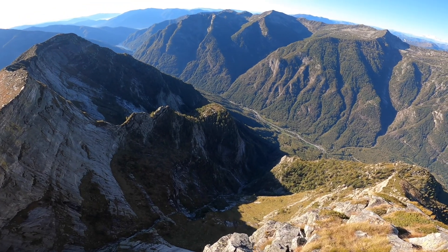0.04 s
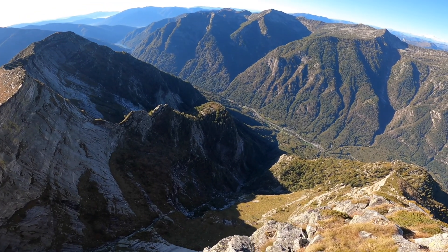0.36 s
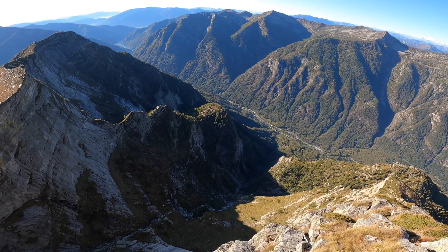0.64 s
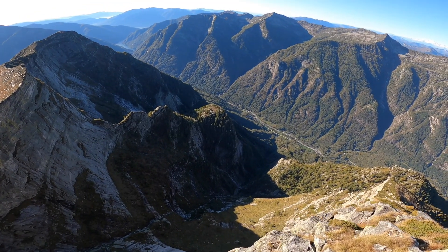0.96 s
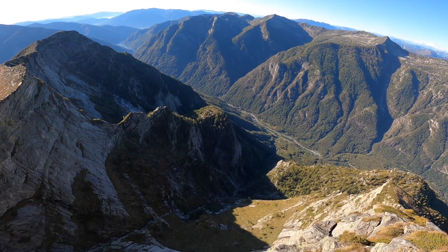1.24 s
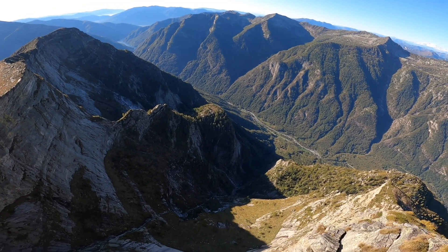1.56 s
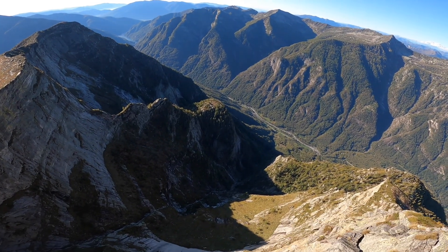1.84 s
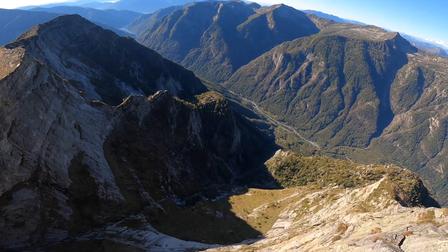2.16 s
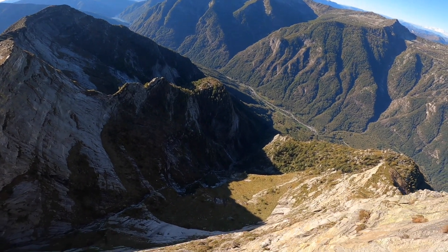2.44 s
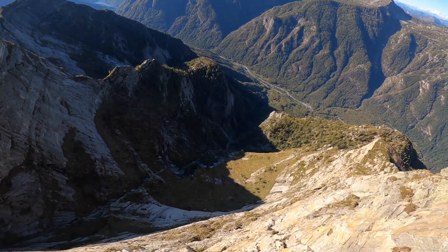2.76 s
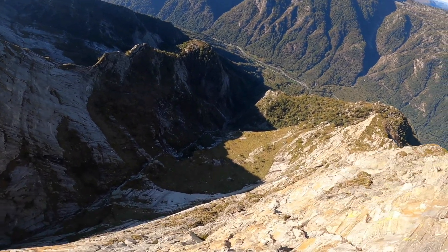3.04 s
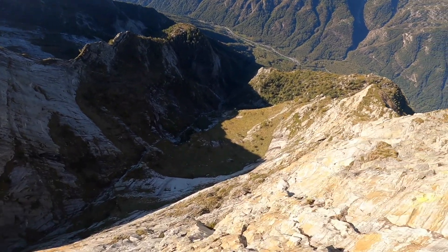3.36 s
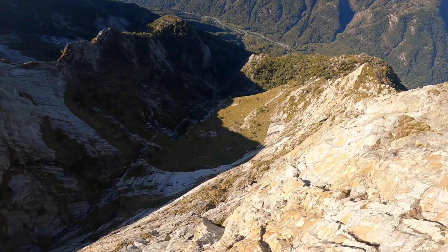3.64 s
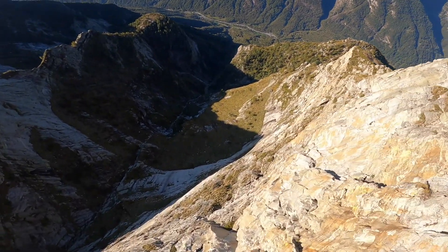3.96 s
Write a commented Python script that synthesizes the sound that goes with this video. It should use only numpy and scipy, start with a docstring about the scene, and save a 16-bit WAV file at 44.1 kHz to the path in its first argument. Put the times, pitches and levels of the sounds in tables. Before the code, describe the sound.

Wind rushes over a body-worn microphone during a jump from a mountain edge. First come a light breeze, gear clicks and shoe scuffs on rock, then a loud buffeting roar with a hiss that brightens as the fall speeds up.

```python
"""A mountain edge, heard from a body-worn microphone: a light breeze nudges it, gear clicks and
shoes scuff off the rock. Then the fall begins. Air buffets the microphone port, eddies tear past
in a ragged roar, and a hiss grows louder, smoother and brighter with speed.
A compressor and a limiter hold the level."""
import sys
import numpy as np
from scipy import signal
from scipy.fft import rfft, irfft
from scipy.io import wavfile
from scipy.ndimage import uniform_filter1d, minimum_filter1d

SR = 44100
rng = np.random.default_rng(int(sys.argv[2]) if len(sys.argv) > 2 else 0)


def master_out(mix):
    """Clip the mix to full scale and print it as 16-bit PCM to the path in sys.argv[1]."""
    frames = np.transpose(np.atleast_2d(mix))
    ceiling = np.clip(frames, -1, 1)
    pcm = np.round(ceiling * 32767).astype(np.int16)
    wavfile.write(sys.argv[1], SR, pcm)


N = 176400
TIME = np.arange(N) / SR

# Clicks of gear and grit. Each row: time in seconds, relative level in dB.
CLICKS = [(0.1828, -30.5), (.730, -44), (0.783, -46), (0.899, -40), (1.215, -26.5), (1.277, -36),
          (1.383, -14.5), (1.3937, -26), (1.401, -26), (1.4298, -19), (1.455, -30), (1.4578, -18.5),
          (1.5055, -30), (1.516, -31.5), (1.6065, -26.5), (1.618, -32)]


def from_db(db):
    """Decibels to gain."""
    return 10 ** (np.asarray(db) / 20)


def curve(rows):
    """An automation curve: straight lines between rows of time in seconds and value."""
    return np.interp(TIME, *np.transpose(rows))


def swell(peak_s, attack_s, decay_s):
    """Exponential rise to a peak of 1, then exponential fall."""
    return np.exp(-np.maximum((peak_s - TIME) / attack_s, (TIME - peak_s) / decay_s))


def noise(colour):
    """Coloured noise at rms 1, rolled off beyond both ends of its colour table."""
    hz, db = np.transpose(colour)
    bins = np.maximum(np.arange(N // 2 + 1) * SR / N, 1)
    gain = from_db(np.interp(np.log(bins), np.log(hz), db))
    gain /= np.sqrt(1 + (hz[0] / bins / 2) ** 4) * (1 + (bins / hz[-1] / 2) ** 4)
    x = irfft(rfft(rng.standard_normal(N)) * gain, N)
    return x / x.std()


def drift(rate_hz):
    """Smooth random motion with a spread of 1."""
    pole = np.exp(-2 * np.pi * rate_hz / SR)
    x = signal.lfilter([1], [1, -2 * pole, pole * pole], rng.standard_normal(N + SR))[SR:]
    return x / x.std()


def resonance(hz, width_hz):
    """Noise at rms 1 ringing in one resonance, whose centre may move."""
    slow = signal.sosfilt(signal.butter(2, width_hz / 2, fs=SR, output="sos"), rng.standard_normal((2, N)))
    phase = 2 * np.pi * np.cumsum(hz * np.ones(N)) / SR
    x = slow[0] * np.cos(phase) + slow[1] * np.sin(phase)
    return x / x.std()


def buffeting(rough_db=2.5, flutter_hz=15.3):
    """Lumpy pressure swings on the port, with a slower, deep rumble under them."""
    # Strength of the swings. Each row: time in seconds, level in dB.
    lump_level = [(0, -48.5), (.33, -51.5), (.42, -45), (.52, -56.5), (.58, -40), (.665, -46), (.69, -28.5),
                  (.73, -41.5), (.78, -31), (.895, -32.5), (.925, -51), (.965, -46), (.985, -32.5),
                  (1.05, -38.5), (1.15, -63), (1.34, -50.5), (1.39, -44), (1.52, -36), (1.545, -25.5),
                  (1.605, -22), (1.64, -18.5), (1.78, -19), (2.3, -15.5), (2.9, -16), (3.25, -16.5),
                  (3.55, -16), (3.75, -17), (4, -12)]
    rumble_level = [(0, -39), (.55, -46), (.8, -36), (.93, -38), (1.04, -30.5), (1.2, -50.5), (1.35, -49),
                    (1.49, -33), (1.56, -25), (1.8, -21.5), (2.0, -26), (2.8, -23), (3.2, -30.5),
                    (4, -19.5)]
    # Their colours. Each row: frequency in Hz, relative level in dB.
    lump_colour = [(22, -7), (45, -1.5), (95, 2), (140, 0), (195, 0.5), (260, -3.5), (330, -6.5),
                   (430, -16.5), (650, -28.5), (1500, -63.5)]
    rumble_colour = [(20, -6.5), (40, -2.5), (65, -5.5), (110, -15.5), (300, -46)]
    lumps = noise(lump_colour) * from_db(curve(lump_level) + rough_db * drift(flutter_hz))
    return lumps + noise(rumble_colour) * from_db(curve(rumble_level))


def hollow_drone():
    """Air drones in a hollow by the port; the pitch wanders with the angle of the flow."""
    # The drone's strength. Each row: time in seconds, level in dB.
    level = [(0, -71), (1.45, -68), (1.77, -26.5), (2.3, -23.5), (2.9, -20), (3.15, -16.5), (3.42, -19),
             (3.52, -31.5), (3.8, -16.5), (4, -39)]
    # Its pitch. Each row: time in seconds, frequency in Hz.
    pitch = [(1.78, 200), (2.4, 160), (2.68, 220), (2.85, 130.1), (3.2, 195), (3.4, 209.8), (3.55, 150),
             (3.85, 205)]
    return resonance(curve(pitch), width_hz=86) * from_db(curve(level))


def wake():
    """The wake of the falling body roars in a broad, low band."""
    # The roar's strength. Each row: time in seconds, level in dB.
    level = [(1.5, -65), (1.65, -29), (2.05, -30), (2.25, -20), (2.6, -22.5), (2.9, -27.5), (3.3, -28.5),
             (3.6, -30), (4, -20)]
    # Its centre. Each row: time in seconds, frequency in Hz.
    centre = [(1.9, 340.5), (2.45, 438.9), (3.65, 319.6)]
    return resonance(curve(centre), width_hz=270) * from_db(curve(level))


def eddies(bursts, gusts, burst_db=1.5, gust_db=1.2):
    """Eddies tear past in a roar made ragged by fast bursts and slower gusts."""
    # Strength of the eddies. Each row: time in seconds, level in dB.
    level = [(0, -75), (.52, -59.5), (.70, -54), (.89, -46.5), (.95, -55.5), (1.15, -63.5), (1.35, -47.5),
             (1.52, -45.5), (1.605, -41), (1.64, -38), (1.72, -19.5), (1.745, -38.5), (1.775, -22),
             (1.86, -27.5), (1.92, -20), (2.1, -23.5), (2.28, -23.5), (2.6, -22.5), (3.1, -26),
             (3.45, -27.5), (4, -23)]
    # Their colour. Each row: frequency in Hz, relative level in dB.
    colour = [(150, -17.5), (330, 3.5), (450, -2), (650, -1), (1000, -6), (1600, -11.5), (2300, -20),
              (4800, -30.5), (7000, -77), (14000, -90.5)]
    return noise(colour) * from_db(curve(level) + burst_db * bursts + gust_db * gusts)


def airstream(bursts, gusts, split_hz=6050):
    """Rushing air hisses, shaken by the eddies; with speed it evens out and gains top."""
    # The hiss follows the speed. Each row: time in seconds, level in dB.
    level = [(0, -81), (1.55, -65), (1.715, -57), (1.75, -62), (1.805, -42), (1.86, -44), (1.92, -38.5),
             (2.1, -38.5), (2.27, -43.5), (2.39, -34.5), (2.44, -40.5), (2.65, -37), (2.8, -38.5),
             (2.88, -35.5), (3.02, -37), (3.1, -30), (3.4, -29.5), (3.65, -26), (3.82, -26), (4, -25.5)]
    # Its colour. Each row: frequency in Hz, relative level in dB.
    colour = [(400, -13.5), (900, -0.5), (1650, 0.5), (2300, -4), (3000, -1.5), (3900, 0.5), (5100, -2),
              (6200, -13.5), (7600, -24), (8700, -23), (11000, -37), (15000, -59.5)]
    level_db = curve(level)
    below_full_db = np.minimum(level_db.max() - level_db, 20)
    flutter_db = (0.5 + 0.13 * below_full_db) * (0.68 * bursts + 0.097 * gusts)
    hiss = noise(colour)
    body = signal.sosfiltfilt(signal.butter(2, split_hz, fs=SR, output="sos"), hiss)
    top = (hiss - body) * from_db(-0.92 * below_full_db)
    return (body + top) * from_db(level_db + flutter_db)


def blasts(rough_db=5.5, crackle_hz=200, top_hz=4800):
    """Short gusts break up into crackle at the port."""
    # Single gusts. Each row: peak time in seconds, level in dB, attack and decay in seconds.
    hits = [(0.689, -51, 0.0024, 0.0055), (0.7632, -30, 0.0016, 0.0095), (1.623, -15, 0.0036, 0.0093),
            (1.668, -20.5, 0.005, 0.0075), (1.719, -17.5, 0.016, 0.013), (1.782, -18.5, 0.011, 0.0072)]
    # Their colour. Each row: frequency in Hz, relative level in dB.
    colour = [(100, 7.5), (320, 14.5), (700, 2.5), (1400, -0.5), (2300, -25), (5000, -24.5)]
    envelope = sum(from_db(db) * swell(s, attack, decay) for s, db, attack, decay in hits)
    crackle = noise(colour) * envelope * from_db(rough_db * drift(crackle_hz))
    return signal.sosfilt(signal.butter(6, top_hz, fs=SR, output="sos"), crackle)


def thumps():
    """Dull knocks of air: each puff pulls the diaphragm in and pushes it back once."""
    # Puffs on the port. Each row: centre in seconds, peak in dB, half-width in seconds.
    puffs = [(0.689, -20.5, 0.0012), (0.7668, -12, 0.0023), (1.78, -9, 0.00069)]
    knocks = np.zeros(N)
    for s, db, half_width in puffs:
        u = (TIME - s) / half_width
        knocks += from_db(db) * u * np.exp((1 - u * u) / 2)
    return knocks


def shoes_and_gear(crest_db=7, scuff_top_hz=6820, rough_db=3, grain_hz=200):
    """Gear and grit click and ring briefly; shoes scrape the rock with a duller, grainy sound."""
    # Shoe scrapes. Each row: peak time in seconds, level in dB, attack and decay in seconds.
    scuffs = [(0.186, -50.5, 0.012, 0.02), (.86, -65, 0.24, 0.074), (1.213, -48.5, 0.0089, 0.02),
              (1.31, -61, 0.14, 0.063), (1.387, -32, 0.0093, 0.02), (1.423, -38, 0.011, 0.0091),
              (1.458, -46.5, 0.0083, 0.053)]
    # Colour of the grit. Each row: frequency in Hz, relative level in dB.
    colour = [(150, 13.5), (400, -0.5), (1500, -4), (2300, 6), (3200, 7.5), (4600, 6), (6200, -2.5),
              (7500, -22), (10000, -26), (14000, -55)]
    # Ring of the gear. Each row: frequency in Hz, width in Hz, relative level in dB.
    modes = [(746, 65, -15.5), (1577, 340, -7.5), (3150, 550, -5.5), (3790, 330, -13), (6180, 490, -23)]
    scrapes = sum(from_db(db) * swell(s, attack, decay) for s, db, attack, decay in scuffs)
    clicks = sum(from_db(db - crest_db) * swell(s, attack_s=0.00094, decay_s=0.0028) for s, db in CLICKS)
    bright = noise(colour) + sum(from_db(db) * resonance(hz, width) for hz, width, db in modes)
    dull = signal.sosfilt(signal.butter(8, scuff_top_hz, fs=SR, output="sos"), bright)
    return bright * clicks + dull * scrapes * from_db(rough_db * drift(grain_hz))


def click_snaps(trim_db=-4, band_hz=(270, 5200)):
    """The first snap of each click: one sharp push."""
    pushes = np.full(N, 1e-18)
    for s, db in CLICKS:
        pushes[int(s * SR)] = from_db(db + trim_db)
    band = signal.butter(4, band_hz, "band", fs=SR, output="sos")
    unit_peak = np.abs(signal.sosfilt(band, signal.unit_impulse(N))).max()
    return signal.sosfilt(band, pushes) / unit_peak


def valley(level_db=-57.5, swell_db=1.7, swell_hz=3):
    """The far hush of the valley, gently swelling."""
    # Colour of the hush. Each row: frequency in Hz, relative level in dB.
    colour = [(30, -5), (300, -10), (700, -6.5), (1600, -7.5), (2400, -19), (4800, -17), (6300, -31.5),
              (8000, -49), (15000, -47)]
    return from_db(level_db + swell_db * drift(swell_hz)) * noise(colour)


def compress(x, threshold_db=-16, share=0.47, average_s=0.022):
    """Turns the gain down by a share of the mean level's excess over the threshold."""
    span = int(average_s * SR)
    power = uniform_filter1d(uniform_filter1d(x * x, span), span)
    level_db = 10 * np.log10(np.abs(power) + 1e-12)
    return x * from_db(-share * np.maximum(level_db - threshold_db, 0))


def limit(x, ceiling_db=-5.5, release_db_per_s=122.5, attack_s=0.0018):
    """Ducks just ahead of each peak over the ceiling, then recovers at a steady rate."""
    over_db = np.maximum(20 * np.log10(np.abs(x[0]) + 1e-9) - ceiling_db, 0)
    release = release_db_per_s * TIME
    cut_db = np.maximum.accumulate(over_db + release) - release
    span = int(attack_s * SR)
    held_db = minimum_filter1d(-cut_db, span)
    return x * from_db(uniform_filter1d(uniform_filter1d(held_db, span), span))


def scene():
    """Wind at the microphone and the take-off, over the hush of the valley; mono."""
    hush = valley()
    low_wind = buffeting() + hollow_drone() + wake()
    bursts, gusts = drift(rate_hz=94), drift(rate_hz=15)  # roar and hiss flutter together
    rush = eddies(bursts, gusts) + airstream(bursts, gusts)
    return (low_wind + rush + blasts() + thumps() + shoes_and_gear() + click_snaps() + hush)[None]


def record(dry, cutoff_hz=16300):
    """A compressor evens the level, a limiter holds the peaks, and the very top is cut."""
    top_cut = signal.cheby2(12, 70, cutoff_hz, fs=SR, output="sos")
    return signal.sosfilt(top_cut, limit(compress(dry)))


dry = scene()
out = record(dry)
master_out(out)
```